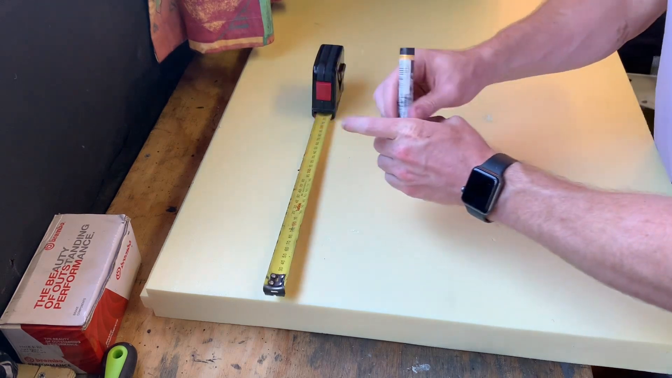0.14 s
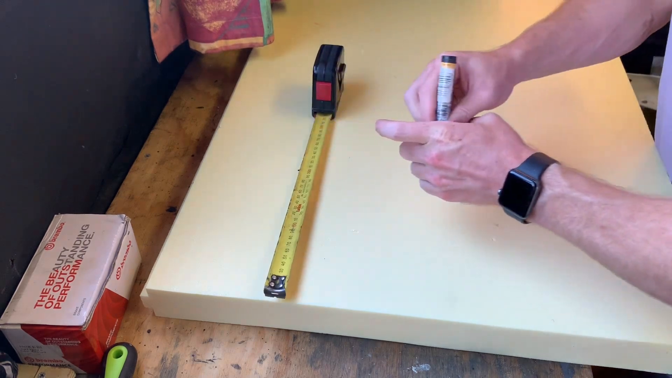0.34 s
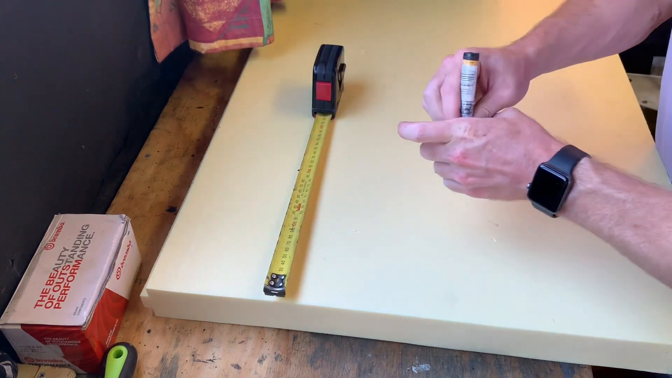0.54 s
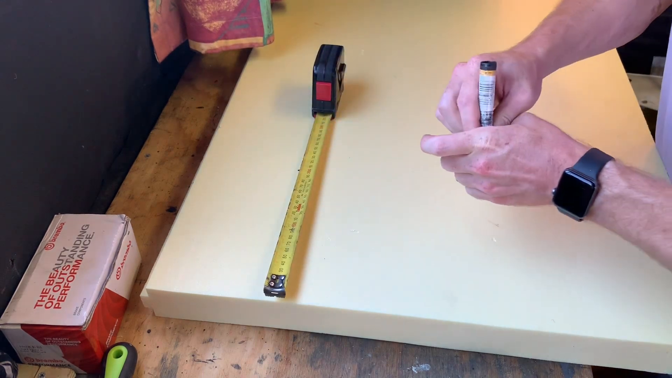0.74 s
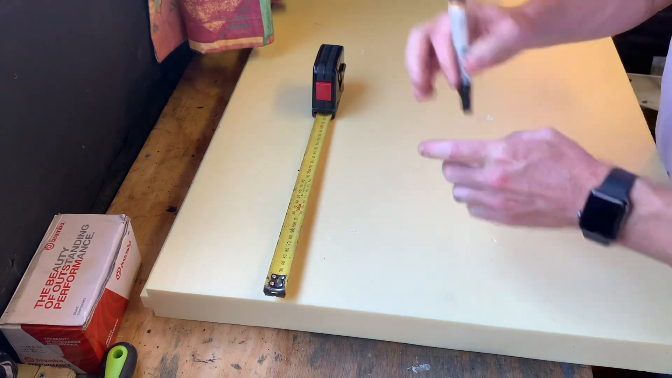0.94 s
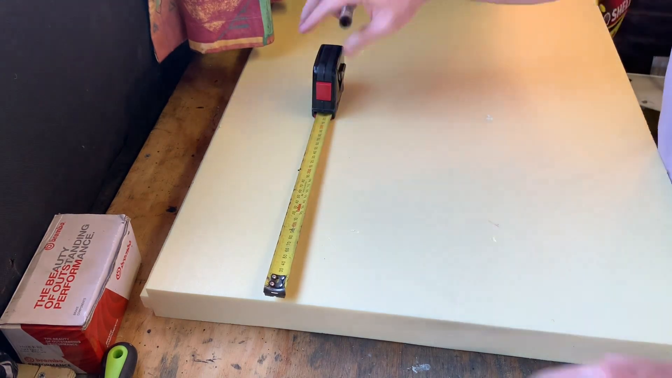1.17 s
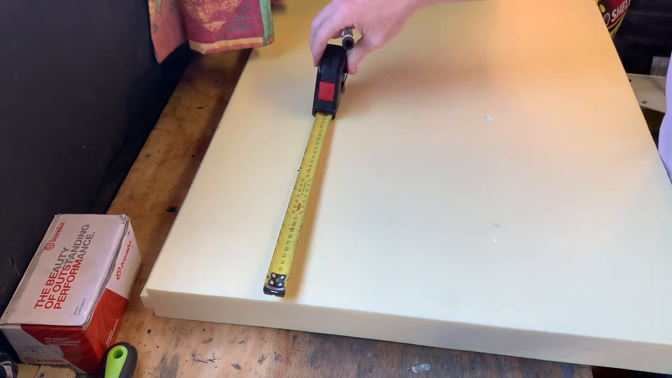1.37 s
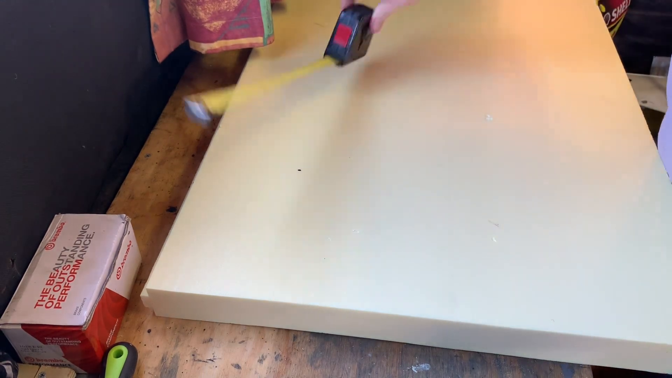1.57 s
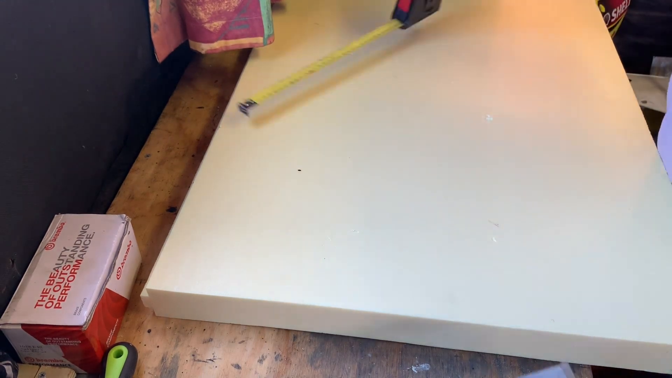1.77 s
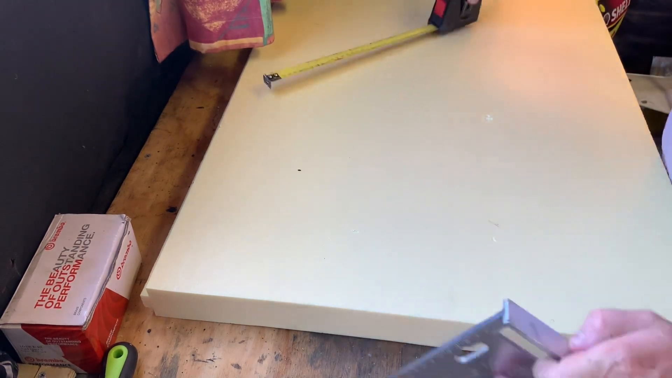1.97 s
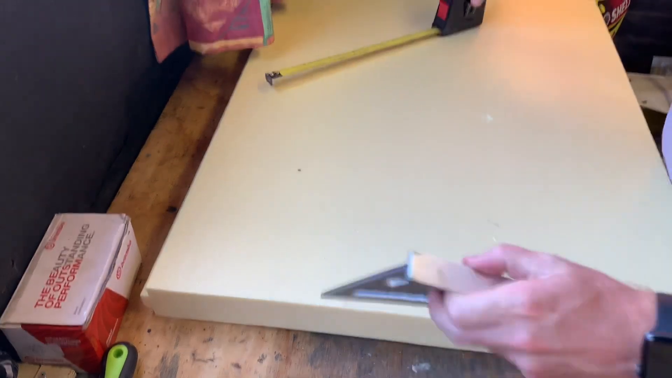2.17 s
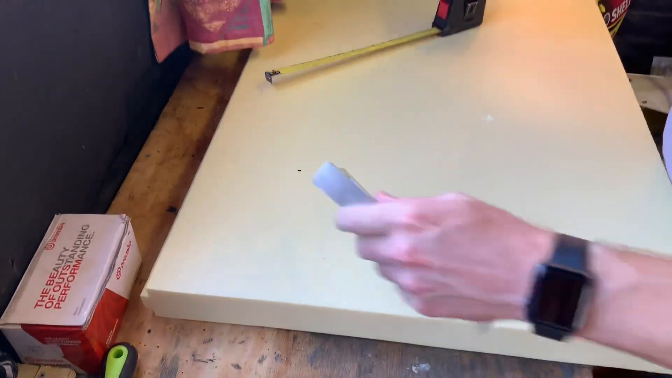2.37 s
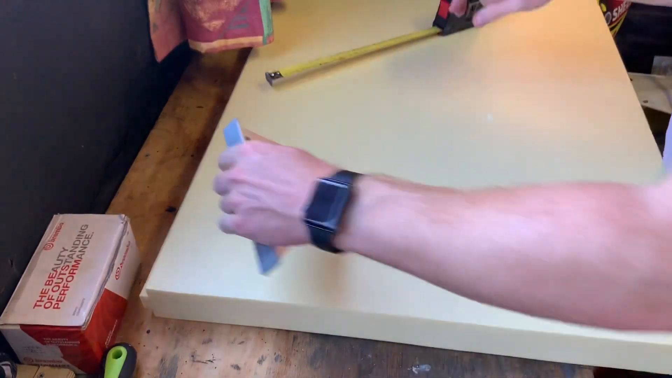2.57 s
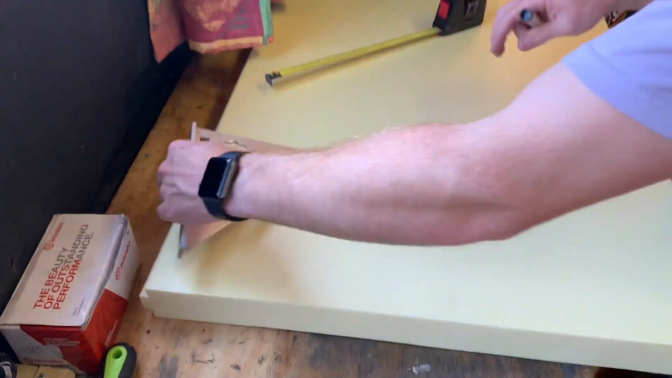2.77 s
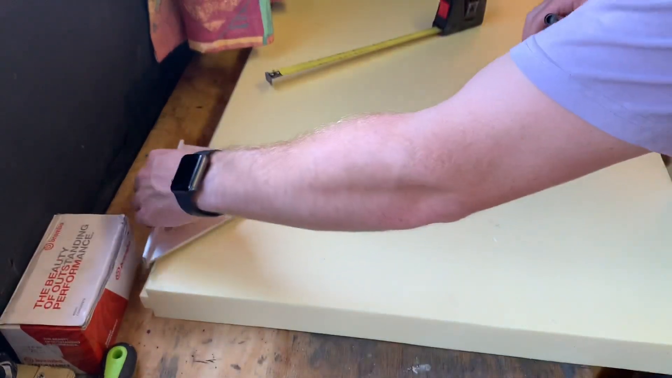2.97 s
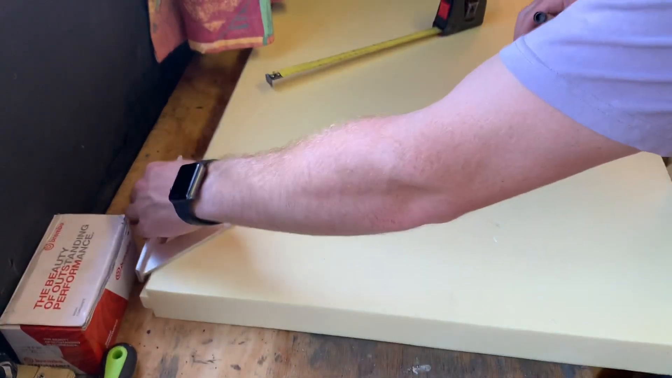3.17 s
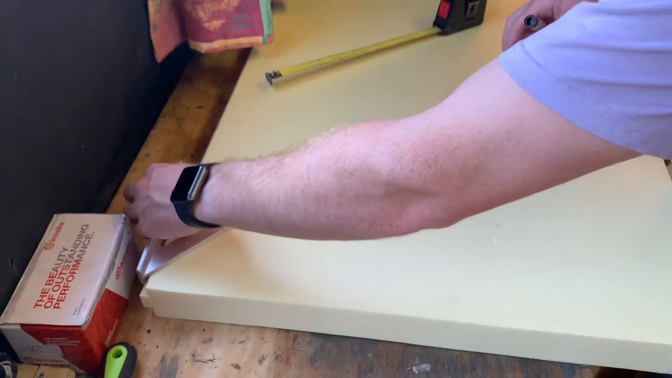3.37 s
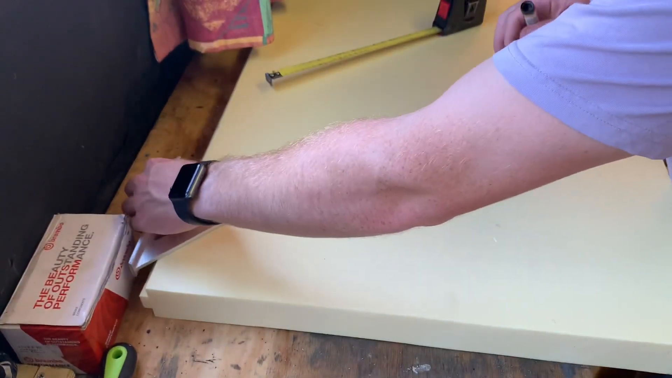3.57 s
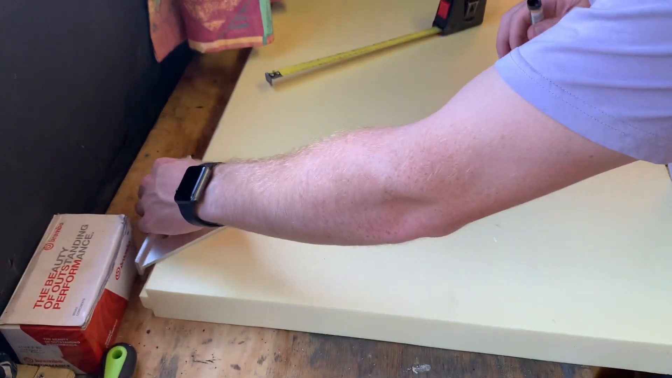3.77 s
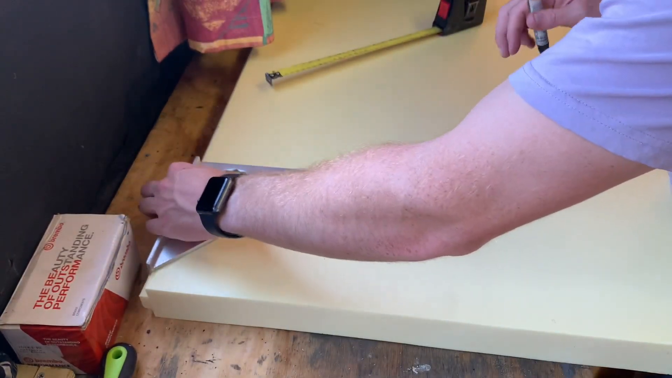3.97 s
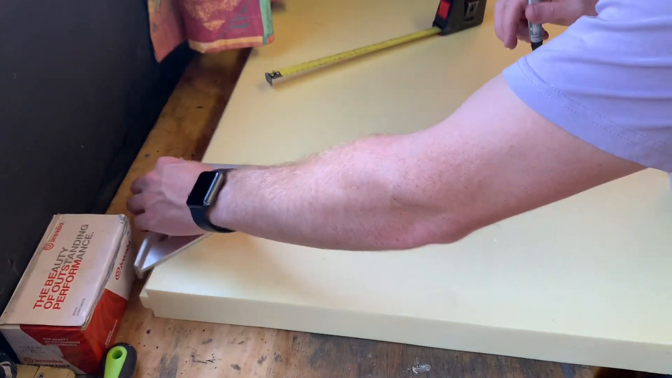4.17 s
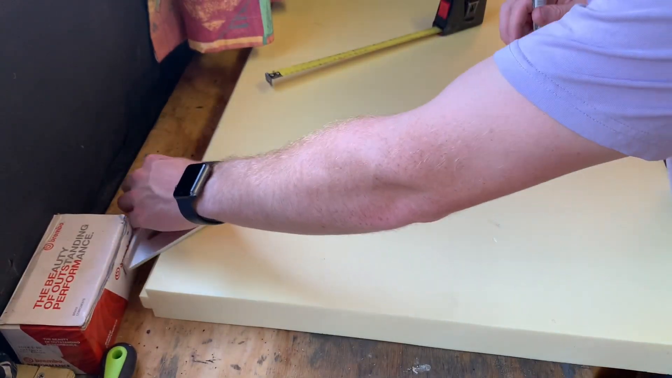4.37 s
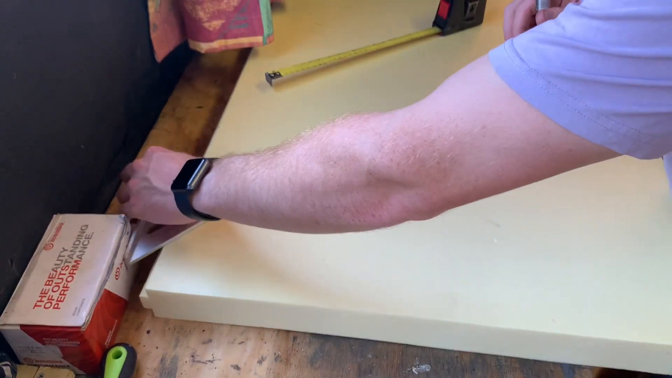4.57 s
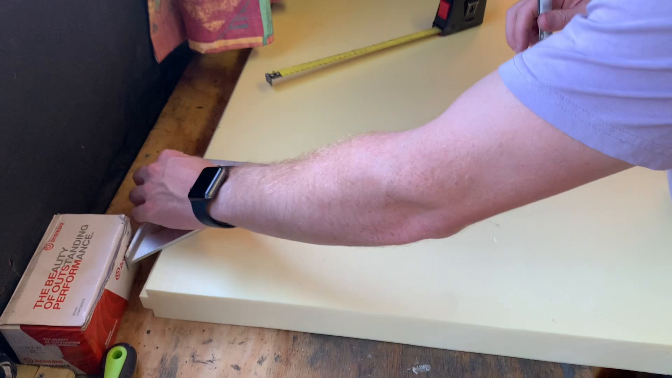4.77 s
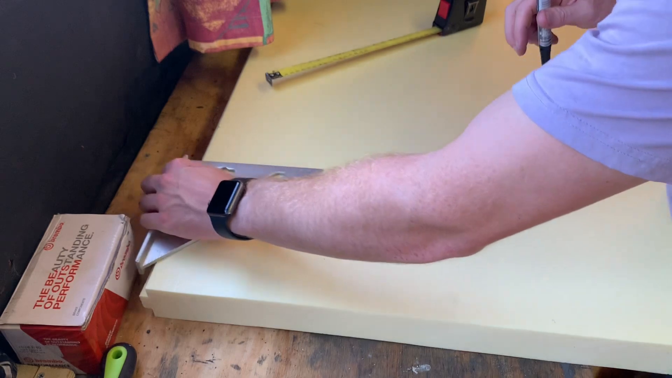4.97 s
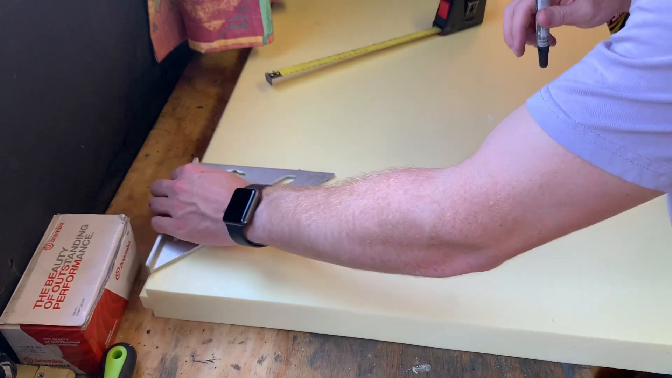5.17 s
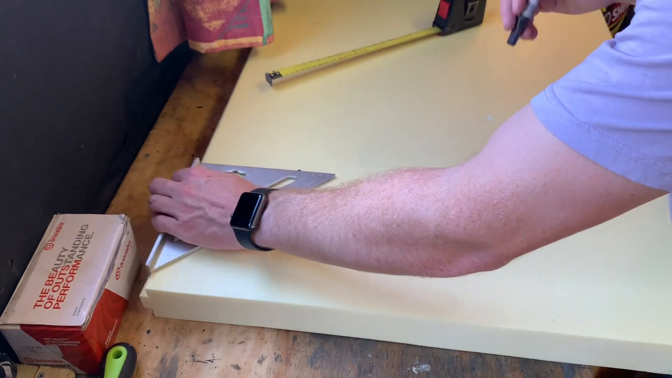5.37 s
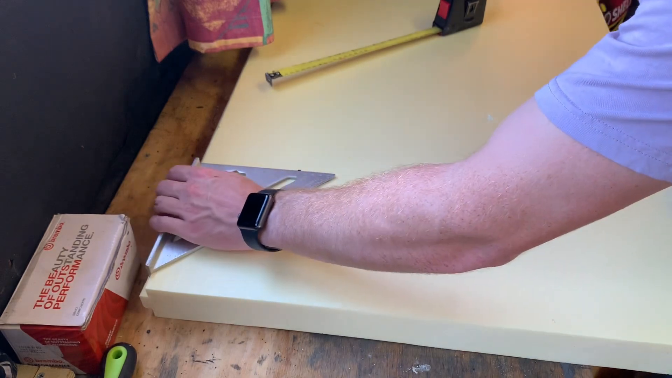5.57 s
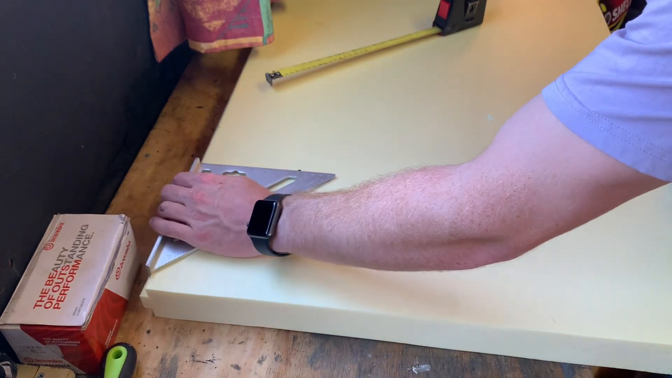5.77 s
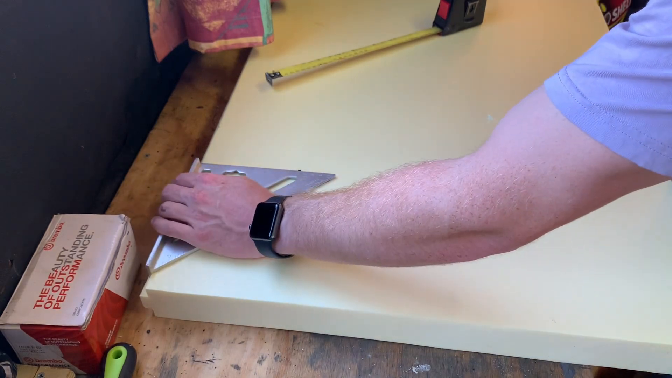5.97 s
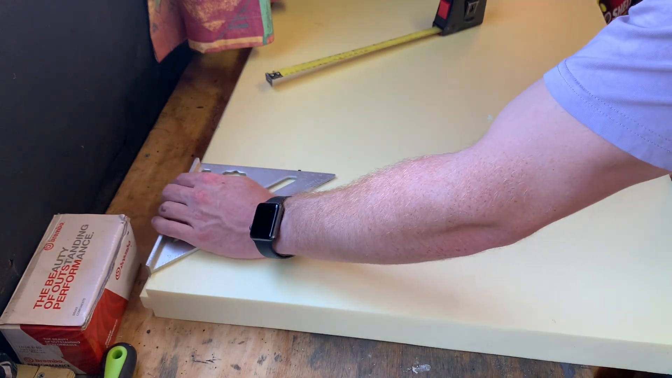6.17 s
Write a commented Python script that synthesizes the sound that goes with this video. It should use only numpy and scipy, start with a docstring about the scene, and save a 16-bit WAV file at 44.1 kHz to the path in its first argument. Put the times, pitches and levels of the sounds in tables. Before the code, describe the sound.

Pen ticks and a cap snap, a steel tape dragged and set down with a rattle, then a metal square scraping on foam.

```python
"""Workbench with pen, tape measure and square

A small furnished home workshop, heard in stereo by small microphones, the room well below the direct sound.
A marker pen is capped, a steel tape measure is dragged aside and set down, a metal square is slid on foam.
Blows ring the modes of board, frame and tools; contacts tick as short bursts of noise and hollow ringing.
Rubbing is grainy coloured noise, partly ringing in narrow resonances; one brief squeak is a falling tone."""
import sys
import numpy as np
from scipy import signal
from scipy.fft import rfft, irfft
from scipy.io import wavfile

SR = 44100
rng = np.random.default_rng(int(sys.argv[2]) if len(sys.argv) > 2 else 0)


def unload_audio(sound):
    """Save the sound as a 16-bit wav file, at the path given as the first command line argument."""
    columns = np.transpose(np.atleast_2d(sound))
    # keep every value between -1 and 1, then stretch to whole-number steps
    steps = np.round(np.clip(columns, -1, 1) * 32767)
    wavfile.write(sys.argv[1], SR, steps.astype(np.int16))


N = 274743
HZ = np.fft.rfftfreq(N, 1 / SR) + 1e-3   # spectrum bins, kept off zero for the logarithms

# Blows on the bench: start_s, board_db (before the ring and thud offsets), sway_db, favoured_hz
BENCH_BLOWS = [(1.798, -30, -40.5, 284), (2.024, -15, -26.5, 440), (2.059, -31, -29, 385),
               (2.129, -29.5, -34, 266), (2.244, -40.5, -41, 180), (2.603, -29, -30.5, 158),
               (2.668, -41, -33.5, 189), (2.737, -42.5, -33, 192), (3.04, -38.5, -66, 377),
               (3.081, -34, -60, 350), (3.091, -9.5, -33.5, 202), (3.114, -57, -49, 180),
               (3.144, -25, -39, 206), (3.168, -53, -47, 210), (3.329, -36, -60, 352),
               (3.336, -12.5, -31.5, 215), (3.938, -26, -49, 200), (3.952, -32.5, -51, 180),
               (4.535, -21, -37, 213), (4.549, -23, -64, 254), (4.677, -22, -41, 230),
               (4.699, -38, -57, 216), (5.131, -28, -45, 187), (5.2, -28, -48, 227),
               (5.712, -52.5, -58, 201), (5.885, -58.5, -79.5, 488)]
# Modes of the bench board: pitch_hz, level_db (relative), t60_s
BOARD_MODES = [(138, 1, 0.18), (154.8, 2.5, 0.13), (192.2, -2.5, 0.14), (225.6, 1.5, 0.14),
               (275.8, -1, 0.05), (360.2, 3, 0.055), (410, -3, 0.05), (460.4, -5.5, 0.084),
               (535, -3.5, 0.071), (601, -3.5, 0.048), (714, -2.5, 0.064), (930, -6, 0.058),
               (1205, -7, 0.054), (1400, -6, 0.031)]
# The bench swaying on its legs: pitch_hz, level_db (relative), t60_s
SWAY_MODES = [(70.8, 3.5, .3), (116.7, -1, .12)]
# Rattles of the loose tape hook: start_s, level_db
HOOK_RATTLES = [(1.799, -26), (1.806, -32), (1.813, -33.5), (1.84, -46), (2.071, -49.5)]
# Modes of the tape hook: pitch_hz, level_db (relative), t60_s
HOOK_MODES = [(902, -2, .09), (1270, -12, 0.07), (2826, -5, 0.029), (5700, 1.5, 0.056), (6740, -2.5, 0.053),
              (7240, -0.5, .07), (10200, 4, 0.1)]
# Modes of the pen cap snapping shut: pitch_hz, level_db (relative), t60_s
CAP_MODES = [(547, -4, 0.02), (1060, -7.5, 0.019), (1950, 0.5, 0.021), (2310, 5, 0.022), (2900, 5.5, 0.027),
             (3560, 2, 0.021), (4250, -1, .02)]
# Modes of the struck square: pitch_hz, level_db (relative), t60_s
SQUARE_MODES = [(1246, -11, 0.054), (1600, 6.5, 0.027), (2010, -8, 0.084), (2190, 1.5, 0.062),
                (3750, -15, .07), (6300, -7.5, .05), (7150, -14, 0.031)]
# Ticks of pen, hook and square: start_s, treble_db, middle_db (1.5-4.5 kHz), hollow_db,
# t60_s (of the treble; the lower bands last a little longer)
CONTACT_TICKS = [(.0024, -47.5, -55, -48.5, 0.061), (0.0446, -51, -63, -63, 0.1),
                 (.0628, -41.5, -54.5, -49, 0.1), (0.0816, -65, -55, -47.5, 0.046),
                 (0.138, -43, -65, -51.5, 0.076), (0.161, -41, -54, -46.5, 0.061),
                 (0.2378, -36, -54, -52.5, 0.06), (0.2437, -62, -56, -47.5, 0.1),
                 (.3057, -52.5, -81, -56, .098), (.3221, -37.5, -71, -48, .063),
                 (.348, -81, -68, -63, 0.14), (0.4854, -52, -64.5, -65, 0.13),
                 (0.5444, -52.5, -57, -65, 0.085), (0.656, -49.5, -39, -48, 0.033),
                 (.863, -59, -57.5, -65, .061), (0.9437, -49.5, -60, -83, 0.076),
                 (.9652, -45.5, -50, -62, 0.05), (1.098, -49, -57, -69, 0.065),
                 (1.535, -60.5, -56, -59.5, .08), (1.6881, -49, -55, -82, .1),
                 (1.778, -41.5, -60, -71, 0.049), (1.7965, -24, -48, -36, .09),
                 (1.8035, -25.5, -38, -28, 0.048), (1.8125, -25, -37, -60, 0.066),
                 (1.8264, -28, -53, -60, 0.061), (1.8365, -26, -38.5, -64.5, 0.079),
                 (2.0154, -46, -46.5, -41.5, 0.13), (2.022, -29.5, -42.5, -53, 0.12),
                 (2.0682, -31.5, -49, -64, 0.099), (2.129, -48.5, -45.5, -45, 0.053),
                 (2.208, -42.5, -53, -52, 0.13), (2.2907, -44.5, -55.5, -53.5, 0.16),
                 (2.3124, -64, -75, -53, 0.13), (2.408, -40, -53.5, -43.5, 0.086),
                 (2.4663, -42.5, -58, -81, 0.07), (2.4921, -40.5, -50, -45.5, 0.075),
                 (2.5703, -44.5, -53.5, -53, 0.19), (2.6006, -29.5, -37, -41, .098),
                 (2.728, -53.5, -57.5, -61, 0.083), (3.0356, -42, -49, -40, 0.052),
                 (3.0884, -56, -72, -32.5, 0.06), (3.1234, -46.5, -74, -55, 0.044),
                 (3.267, -33.5, -50, -45.5, 0.064), (3.3337, -69, -59, -34, 0.027),
                 (3.9494, -29.5, -35.5, -36.5, 0.039), (4.07, -45.5, -60, -72, 0.13),
                 (4.5335, -62, -74, -33, 0.046), (4.6783, -44, -62, -36, 0.051),
                 (5.1954, -46.5, -43.5, -37, 0.03), (5.51, -62, -84.5, -80.5, .09),
                 (5.535, -65, -78, -84.5, 0.073), (5.582, -72, -74, -83, 0.069),
                 (5.7077, -56, -59.5, -51.5, .094), (5.778, -64.5, -65, -83, .08)]
# Treble crack of a tick: pitch_hz, density_db (per Hz, relative)
CRACK_COLOUR = [(4000, -11.5), (4600, -9.5), (5500, -9), (6300, -9), (7200, -5.5), (8500, -5.5),
                (10300, -11), (12500, -10.5), (16000, -17)]
# Plastic shells of pen and tape case: pitch_hz, width_hz, level_db (relative)
HOLLOW_SHELLS = [(516, 120, -5), (760, 140, 3.5), (922.5, 72, 4), (1200, 130, -9), (1230, 170, -14)]
# Rubbing strokes of hands, tape case and square: start_s, length_s, swell_db (over the stroke),
# hiss_db, body_db, rumble_db, sway_db (layer gains before each layer's own changes)
RUB_STROKES = [(-.05, 0.55, -15, -62, -72, -61, -56), (0.589, 0.11, 0, -60, -76, -74, -73),
               (0.905, 0.24, -0.5, -65.5, -79.5, -70, -82), (1.317, 0.13, -9, -72, -68.5, -64, -46.5),
               (1.539, 0.13, -6, -56, -55, -43, -76), (1.697, 0.059, -4, -55.5, -55, -39.5, -62),
               (1.822, 0.066, -3.5, -48.5, -71, -49, -60), (2.025, 0.13, -5, -47.5, -52.5, -39, -33.5),
               (2.203, 0.37, -3.5, -60, -70.5, -54.5, -48), (2.72, .33, 9.5, -61.5, -68, -69, -59),
               (3.094, 0.15, 1.5, -65, -85, -50, -47.5), (3.236, .33, -2, -49.5, -61, -57.5, -57.5),
               (3.579, .19, -2.5, -46.5, -57, -55.5, -57.5), (3.747, 0.19, 1, -46, -59.5, -57.5, -63),
               (4.038, 0.24, -4, -43.5, -55.5, -53, -59), (4.316, 0.2, -10.5, -40.5, -53.5, -54, -63),
               (4.523, 0.29, -2.5, -45, -55.5, -56, -54), (4.804, 0.34, 3.5, -47.5, -61.5, -61, -67),
               (5.233, 0.047, 1, -68, -82, -64.5, -54), (5.454, 0.066, 2, -87, -88, -71, -64),
               (5.526, 0.17, -0.5, -73, -84, -73, -70.5), (5.762, 0.027, -1, -65, -86, -64.5, -64),
               (5.836, .1, -3, -64.5, -80, -72.5, -70), (6.128, .1, 1, -72, -91, -79, -77)]
# The quiet workshop between strokes: hiss_db, body_db, rumble_db, sway_db (same layer gains)
STILL_LEVELS = (-77.5, -84.5, -76.5, -72.5)
# Hiss of the sliding square: pitch_hz, density_db (per Hz, relative)
SLIDE_HISS_COLOUR = [(2500, -12), (4000, -5.5), (5500, -5.5), (7000, -0.5), (8500, -0.5), (10000, 2),
                     (11500, -1), (13500, -6), (16000, -8.5)]
# Rustle of skin and cloth: pitch_hz, density_db (per Hz, relative)
RUSTLE_COLOUR = [(1800, -11.5), (2800, -5.5), (3900, 2), (5000, -3), (7000, -5), (8500, -0.5),
                 (11000, -5.5), (13500, -4.5), (16000, -6)]
# Duller sound of the tool body: pitch_hz, density_db (per Hz, relative)
BODY_COLOUR = [(400, -3), (550, -2), (750, 1), (1000, 1.5), (1500, -1), (2200, 1.5), (3200, -9),
               (4500, -17)]
# Rumble of the board under rubbing: pitch_hz, density_db (per Hz, relative)
RUMBLE_COLOUR = [(100, -9), (140, 1.5), (200, -5.5), (300, -12), (450, -10), (650, -19.5)]
# Deep sway of the bench under rubbing: pitch_hz, density_db (per Hz, relative)
DEEP_COLOUR = [(30, -12.5), (50, -1.5), (70, -3.5), (90, -2.5), (115, -8.5)]
# Resonances of the rubbed square: pitch_hz, width_hz, level_db (relative)
SQUARE_SONG = [(710, 50, -8), (904, 40, -9), (1210, 30, 1), (1600, 36, -3), (1940, 60, -12),
               (2200, 60, -12)]
# Foam sheet under the sliding square: pitch_hz, width_hz, level_db (relative)
FOAM_THRUM = [(216, 14, -2), (178, 54, -1)]
# Whistle of the dragged tape blade over time: time_s, level_db
BLADE_LEVEL = [(1.51, -100), (1.548, -50.5), (1.57, -49), (1.654, -54), (1.706, -68.5), (1.78, -100)]
# Resonances of the dragged blade: pitch_hz, width_hz, level_db (relative)
BLADE_SONG = [(3190, 40, -1), (4720, 40, -3), (5340, 35, -3), (2500, 80, -6), (7250, 100, -4),
              (9900, 120, -6)]
# Tape case shuddering on foam: pitch_hz, width_hz, level_db (relative)
CASE_THRUM = [(196, 15, 2.5), (257, 24, -10), (320, 40, -13), (560, 35, -10.5), (686, 55, -11.5)]
# Skin slipping on metal: time_s, pitch_hz (before its waver), level_db (before its waver)
SKIN_SQUEAK = [(2.725, 1550, -85), (2.735, 1450, -57), (2.77, 1150, -61), (2.8, 980, -61), (2.83, 950, -85)]
# Stereo image by pitch, likeness of the two channels and phase lead of the left:
# pitch_hz, likeness (0-1, for layers unrelated in the two arrivals), left_lead_rad
STEREO_IMAGE = [(0, .97, 0), (350, .85, .1), (700, .62, .2), (1200, .7, .4), (2100, .55, 2.2),
                (2900, .4, 3.0), (4600, .4, 3.1), (5500, .5, 2.6), (6300, .85, 0), (6900, .9, -.4),
                (7900, .995, -2.9), (8900, .995, -3.2), (9700, .9, -4.7), (10400, .99, -6.1),
                (11600, .98, -6.4), (12300, .86, -8), (12700, .99, -9.2), (14100, .99, -9.7),
                (14800, .86, -11.2), (15300, .99, -12.5), (16500, .99, -12.6)]
# Left channel above the right: pitch_hz, level_db
LEFT_ABOVE_RIGHT = [(60, 1.4), (250, 1), (500, 2), (1000, 1), (4000, -1), (8000, -0.5)]

# Blows
BOARD_RING_DB = -11   # ringing of the board against the blow's board level
THUD_DB, THUD_T60_S = 2, 0.031   # first dull push, against the same level
FOAM_CUT_HZ = 91   # the foam swallows the slowest part of a push
CAP_S, CAP_DB = .6575, -38.5   # the pen cap snaps shut
CLACK_S, CLACK_DB = 2.6, -35.5   # the square's edge meets the bench
# Ticks
TICK_RISE_S, RISE_HALVES_DB = 0.0046, 20   # rise of a -50 dB tick, halved by so many dB more
TICK_SNAP, SNAP_S = 1.9, .0017   # gain and decay time of the added first snap
HOLLOW_LAG = 2   # the hollow ring swells so many times slower than the crack
# Rubbing
SQUARE_DOWN_S, SQUARE_STILL_S = 2.9, 5.3   # between these the square slides and sings
SQUARE_SHARE_DB, SQUARE_THRUM_DB = 0, 7.5   # its singing against the body noise, its thrum against the rumble
STROKE_ATTACK_S, STROKE_RELEASE_T60_S = .03, 0.24
SLIDE_ATTACK_S = 0.062   # the heavy square gathers speed more slowly
CASE_THRUM_DB = 9   # above the whistle
# Room and pickup
ROOM_T60_S, ROOM_DB, ROOM_CUT_HZ = 0.19, -10, 5000
BASS_CUT_HZ, TOP_STOP_HZ = 48, 16200   # from TOP_STOP_HZ upward all is at least 55 dB down


def knocks():
    """Tools set down or pressed ring the board and sway the frame; hook, cap and square ring by themselves."""
    s, board_db, sway_db, favoured_hz = np.transpose(BENCH_BLOWS)
    board = struck(BOARD_MODES, s, board_db + BOARD_RING_DB, favoured_hz, spread_db=3.0, narrow=3.66, swell=.0016)
    sway = struck(SWAY_MODES, s, sway_db, favoured_hz, spread_db=.7, narrow=0, swell=.004)
    hook_s, hook_db = np.transpose(HOOK_RATTLES)
    hook = struck(HOOK_MODES, hook_s, hook_db, 0 * hook_s + 3000, spread_db=2, narrow=0, swell=.00072)
    cap = struck(CAP_MODES, [CAP_S], [CAP_DB], [2000], spread_db=1, narrow=0, swell=.0002)
    square = struck(SQUARE_MODES, [CLACK_S], [CLACK_DB], [2000], spread_db=1, narrow=0, swell=.0005)
    return board + thuds(s, board_db, favoured_hz) + sway + hook + cap + square


def struck(modes, times, levels_db, favoured_hz, spread_db, narrow, swell):
    """Each blow rings decaying modes by chance strengths, weakened by narrow dB per octave off its pitch."""
    out, t = np.zeros((2, N)), np.arange(SR // 2) / SR
    luck = rng.standard_normal((len(times), 2, len(modes)))
    hz, level_db, t60 = np.transpose(modes)[:, :, None]
    decay = from_db(level_db - 60 * t / t60)
    soft_start = 1 - np.exp(-t / swell)   # foam softens the contact
    rings = np.sin(2 * np.pi * hz * t) * decay * soft_start
    rings[1::2] *= -1   # neighbouring modes start in opposite sense
    for s, blow_db, centre, draw in zip(times, levels_db, favoured_hz, luck):
        aim_db = -narrow * np.abs(np.log2(hz[:, 0] / centre))
        blow = from_db(blow_db + aim_db + spread_db * draw) @ rings
        start = round(s * SR)
        out[:, start:start + len(t)] += blow[:, :N - start]
    return out


def thuds(times, levels_db, favoured_hz):
    """The spot under each blow gives way once and settles within a few cycles."""
    out, t = np.zeros(N), np.arange(SR // 8) / SR
    for s, level_db, hz in zip(times, levels_db, favoured_hz):
        decay = from_db(level_db + THUD_DB - 60 * t / THUD_T60_S)
        push = np.sin(2 * np.pi * hz * t) * decay * (1 - np.exp(-t / .001))
        start = round(s * SR)
        out[start:start + len(t)] += push[:N - start]
    return signal.sosfilt(signal.butter(2, FOAM_CUT_HZ, "high", fs=SR, output="sos"), out)


def ticks():
    """Hard little contacts: a crack of noise that swells in a few ms and dies away, lower bands a little slower."""
    middle_colour = [(1500, -4.9), (2200, 1.5), (3000, 1.1), (4500, -2.5)]   # pitch_hz, density_db
    bands = [coloured(CRACK_COLOUR), coloured(middle_colour), singing(HOLLOW_SHELLS)]
    chatter = from_db(1.4 * drift(540))   # each contact breaks up into tiny rebounds
    out, t = np.zeros((2, N)), np.arange(SR // 3) / SR
    for s, *levels_db, t60 in CONTACT_TICKS:
        start = round(s * SR)
        rise = TICK_RISE_S * .5 ** ((max(levels_db) + 50) / RISE_HALVES_DB)   # stronger is quicker
        for band, level_db, slower, lag in zip(bands, levels_db, (1, 1.1, 1.3), (1, 1, HOLLOW_LAG)):
            decay = from_db(-60 * t / (max(t60, .01) * slower))
            snap = TICK_SNAP * np.exp(-t / SNAP_S)
            shape = (decay + snap) * (1 - np.exp(-t / (rise * lag)))
            out[:, start:start + len(t)] += from_db(level_db) * shape[:N - start] * band[:, start:start + len(t)]
    return out * chatter


def rubbing():
    """Foam cells snap under the sliding tool: grainy hiss, a duller body sound, rumble and sway in the bench."""
    hiss_gain, body_gain, rumble_gain, sway_gain = stroke_levels()
    t = np.arange(N) / SR
    laid = np.clip(np.minimum(t - SQUARE_DOWN_S, SQUARE_STILL_S - t) / .1, 0, 1)   # 1 while the square slides
    grain = hiss_gain * from_db(1.8 * drift(22) + 0.45 * drift(400))
    hiss = grain * (laid * coloured(SLIDE_HISS_COLOUR) + (1 - laid) * coloured(RUSTLE_COLOUR))
    body = coloured(BODY_COLOUR) + laid * from_db(SQUARE_SHARE_DB) * singing(SQUARE_SONG)
    rumble = coloured(RUMBLE_COLOUR) + laid * from_db(SQUARE_THRUM_DB) * singing(FOAM_THRUM)
    judder = drift(25)   # stick and slip shakes tool and board together
    tool = body_gain * from_db(3.1 * judder) * body
    board = rumble_gain * from_db(-6.2 * laid + 2.1 * judder) * rumble
    return hiss + tool + board + sway_gain * coloured(DEEP_COLOUR)


def stroke_levels():
    """Gains of the four rubbing layers: each stroke sets in, swells or fades along its length and dies away."""
    t, power = np.arange(N) / SR, from_db(STILL_LEVELS)[:, None] ** 2
    for start, length, swell_db, *levels_db in RUB_STROKES:
        sliding = SQUARE_DOWN_S < start < SQUARE_STILL_S
        attack = SLIDE_ATTACK_S if sliding else STROKE_ATTACK_S
        onset = np.clip((t - start) / attack, 0, 1) ** 2
        along_db = swell_db * np.clip((t - start) / length, 0, 1)
        release_db = -60 * np.maximum(t - start - length, 0) / STROKE_RELEASE_T60_S
        power = power + (from_db(levels_db)[:, None] * onset * from_db(along_db + release_db)) ** 2
    return np.sqrt(power)


def blade():
    """The steel blade whistles and the case thrums while the tape is dragged over the foam."""
    level_db, = in_time(BLADE_LEVEL)
    return from_db(level_db) * (singing(BLADE_SONG) + from_db(CASE_THRUM_DB) * singing(CASE_THRUM))


def squeak():
    """Skin slips on metal: a brief falling tone, wavering in pitch and strength."""
    hz, level_db = in_time(SKIN_SQUEAK)
    heard = level_db > max(SKIN_SQUEAK[0][2], SKIN_SQUEAK[-1][2])   # silent at and beyond the end rows
    gain = heard * from_db(level_db + 2.1 * drift(60))
    wavering_hz = hz * (1 + 0.033 * drift(115))
    return gain * np.sin(2 * np.pi * np.cumsum(wavering_hz) / SR)


def room(x):
    """A small furnished room: a dense tail of noise that dies fast, limited in bass and treble."""
    t = np.arange(SR // 2) / SR
    tail = rng.standard_normal((2, len(t))) * from_db(-60 * t / ROOM_T60_S) * (t > .004)
    tail = signal.sosfilt(signal.butter(1, [200, ROOM_CUT_HZ], "band", fs=SR, output="sos"), tail)
    return signal.fftconvolve(x, rms_one(tail) / np.sqrt(len(t)), axes=1)[:, :N]


def singing(resonances):
    """Friction noise ringing in narrow resonances, each flickering in level; unit power in all."""
    white, out = rng.standard_normal((2, N)), 0
    for hz, width, level_db in resonances:
        r = np.exp(-np.pi * width / SR)   # pole radius for this width
        tone = signal.lfilter([1, 0, -1], [1, -2 * r * np.cos(2 * np.pi * hz / SR), r * r], white)
        out = out + from_db(level_db + 1.8 * drift(18)) * rms_one(tone)
    return rms_one(out)


def coloured(spectrum):
    """Two unrelated noises with the given spectrum, falling 93 dB per octave beyond its ends."""
    hz, db = np.transpose(spectrum)
    octaves_beyond = np.maximum(np.log2(hz[0] / HZ), 0) + np.maximum(np.log2(HZ / hz[-1]), 0)
    gain = from_db(np.interp(np.log(HZ), np.log(hz), db) - 93 * octaves_beyond)
    return rms_one(irfft(rfft(rng.standard_normal((2, N))) * gain, N))


def drift(rate_hz):
    """Random wander of unit power: noise low-passed at rate_hz."""
    return rms_one(signal.sosfilt(signal.butter(2, rate_hz, fs=SR, output="sos"), rng.standard_normal(N)))


def in_time(rows):
    """Columns of a time curve, drawn straight between its rows at every sample."""
    s, *columns = np.transpose(rows)
    return [np.interp(np.arange(N) / SR, s, c) for c in columns]


def rms_one(x):
    """Scaled to unit power."""
    return x / np.sqrt(np.mean(x ** 2) + 1e-20)


def from_db(db):
    """Gain of a level in dB."""
    return 10 ** (np.asarray(db) / 20)


def scene():
    """Two arrivals of the same events at the bench, with the room's answer."""
    direct = ticks() + knocks() + rubbing() + blade() + squeak()
    return direct + from_db(ROOM_DB) * room(direct)


def record(dry):
    """The right channel is the left phase-shifted plus some second arrival turned a quarter cycle late."""
    hz, likeness, lead_rad = np.transpose(STEREO_IMAGE)
    alike = np.clip(np.interp(HZ, hz, likeness), 0, 1)
    lag = np.exp(-1j * np.interp(HZ, hz, lead_rad))
    first, second = rfft(dry)
    right = alike * first * lag + np.sqrt(1 - alike ** 2) * second * -1j
    tilt_hz, tilt_db = np.transpose(LEFT_ABOVE_RIGHT)
    tilt = from_db(np.interp(np.log(HZ), np.log(tilt_hz), tilt_db) / 2)   # half to each channel
    stereo = irfft(np.array([first * tilt, right / tilt]), N)
    # small capsules lose the deepest bass
    stereo = signal.sosfilt(signal.butter(3, BASS_CUT_HZ, "high", fs=SR, output="sos"), stereo)
    return signal.sosfilt(signal.cheby2(20, 55, TOP_STOP_HZ, fs=SR, output="sos"), stereo)


dry = scene()
out = record(dry)
unload_audio(out)
```